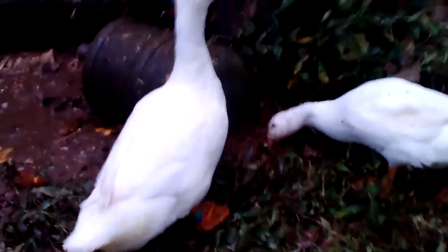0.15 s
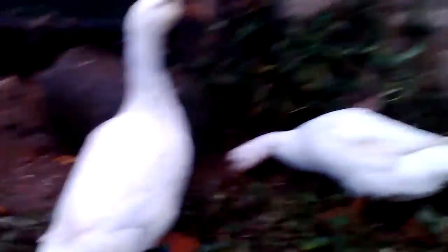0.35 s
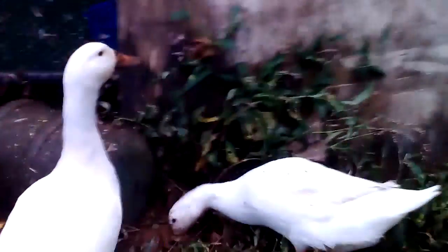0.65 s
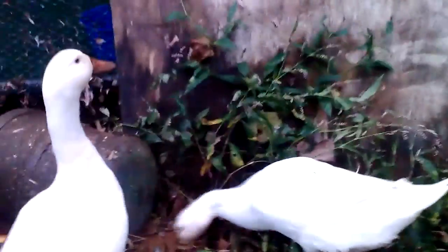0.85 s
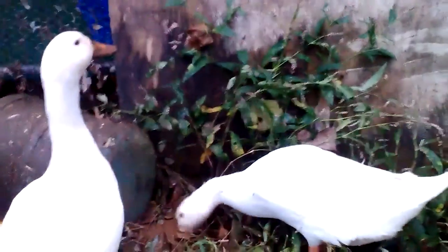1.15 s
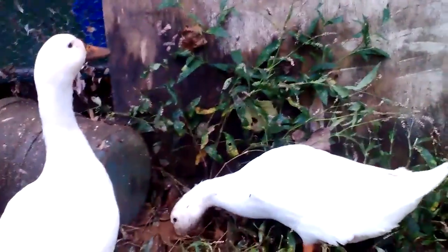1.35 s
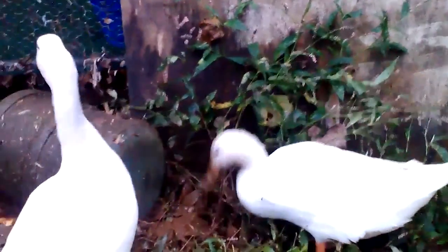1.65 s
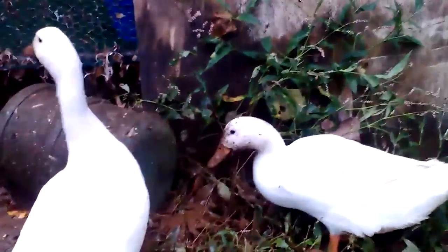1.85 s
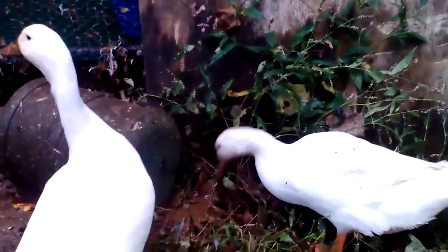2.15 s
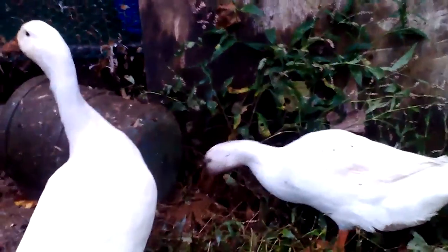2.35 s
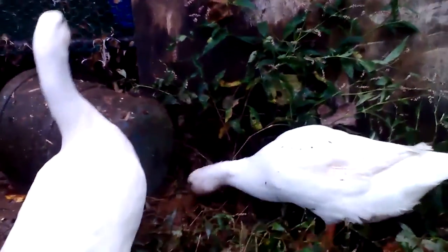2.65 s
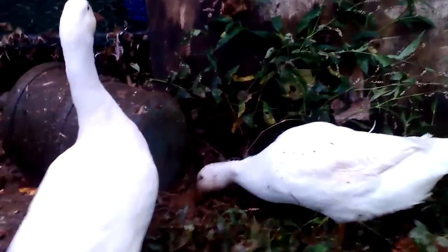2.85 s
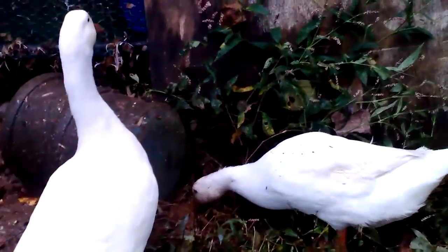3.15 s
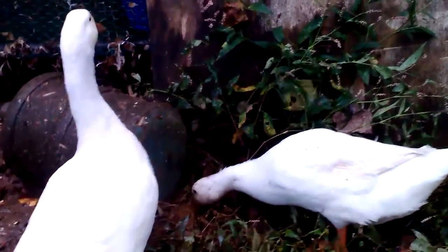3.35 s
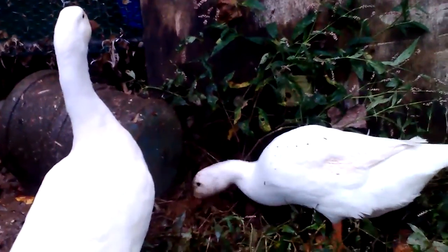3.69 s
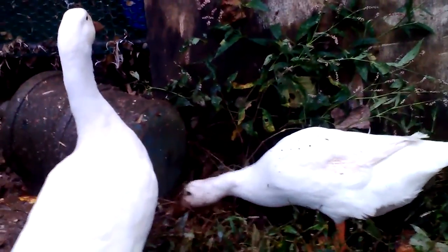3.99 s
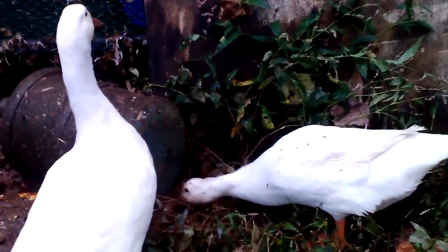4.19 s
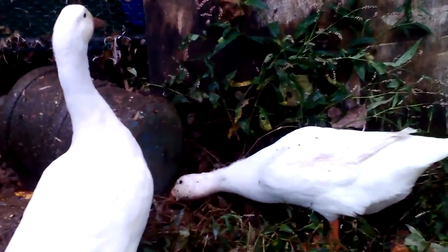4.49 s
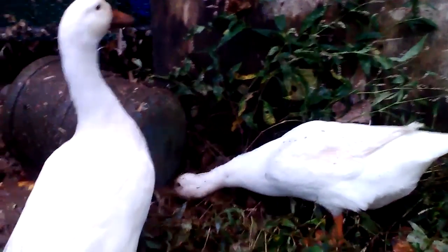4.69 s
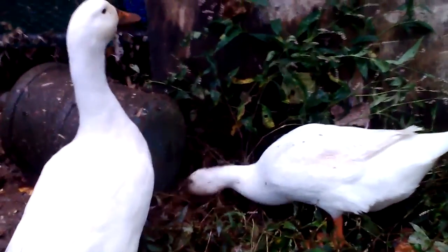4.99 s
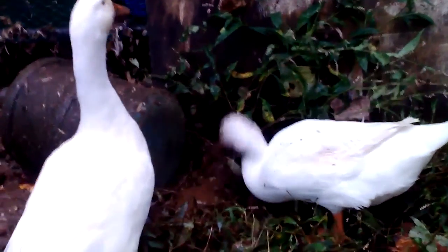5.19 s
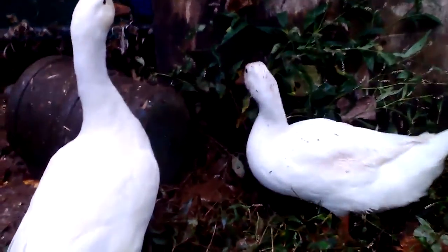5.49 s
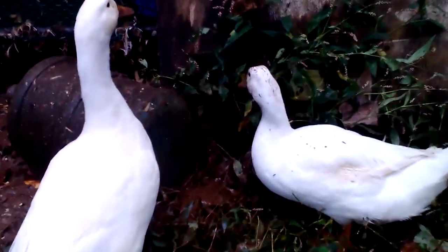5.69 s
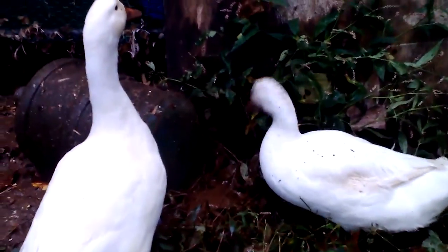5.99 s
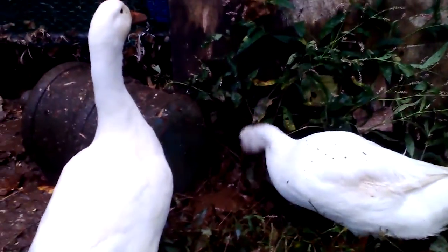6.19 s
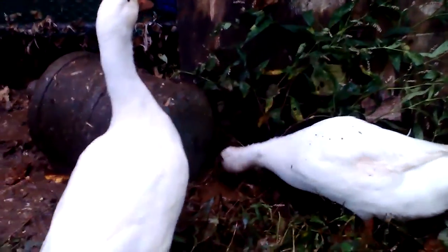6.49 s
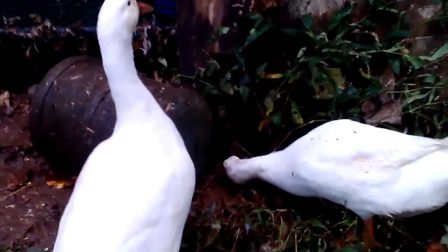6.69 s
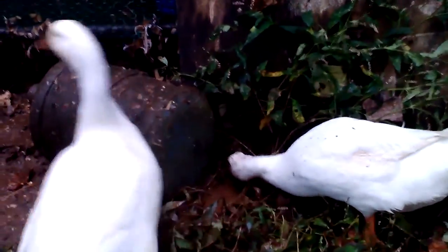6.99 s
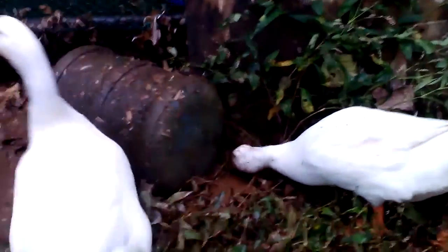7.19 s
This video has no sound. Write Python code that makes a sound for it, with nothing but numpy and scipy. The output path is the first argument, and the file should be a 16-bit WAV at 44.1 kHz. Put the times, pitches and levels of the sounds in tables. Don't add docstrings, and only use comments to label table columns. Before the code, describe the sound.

A drake gives short, raspy, low-pitched quacks, often in pairs, over steady hiss, while bills pop, smack and dabble in wet mud outdoors.

```python
import sys
import numpy as np
from scipy import signal
from scipy.fft import rfft, irfft, next_fast_len
from scipy.io import wavfile
from scipy.ndimage import uniform_filter1d, map_coordinates

SR = 44100
rng = np.random.default_rng(int(sys.argv[2]) if len(sys.argv) > 2 else 0)


def gain_from_db(level_db):
    decades = np.asarray(level_db, float) / 20
    return 10 ** decades


def master_out(mix):
    frames = np.transpose(np.atleast_2d(mix))
    ceiling = np.clip(frames, -1, 1)
    pcm = np.round(ceiling * 32767).astype(np.int16)
    wavfile.write(sys.argv[1], SR, pcm)


N = 323680
t = np.arange(N) / SR


def unit(x):
    return x / np.sqrt(np.mean(x ** 2) + 1e-20)


def along(points, hz):
    f, v = np.transpose(points)
    return np.interp(np.log(hz + 1), np.log(f + 1), v)


def wobble(rate_hz):
    return map_coordinates(rng.standard_normal(int(N * rate_hz / SR) + 4), [t * rate_hz])


def filtered(x, response):
    m = next_fast_len(len(x) + 8192)
    return irfft(rfft(x, m) * response(np.fft.rfftfreq(m, 1 / SR)), m)[:len(x)]


def peak(hz, width_hz, f):
    return 1j * f * width_hz / (hz * hz - f * f + 1j * f * width_hz)


def moving(x, hz, width_hz):
    turn = np.exp(2j * np.pi * np.cumsum(hz) / SR)
    pole = np.exp(-np.pi * width_hz / SR)
    return 2 * np.real(turn * signal.lfilter([(1 - pole) ** 2], [1, -2 * pole, pole ** 2], x / turn))


# freq_hz, density_db
HISS_SPECTRUM = [(15, -51.5), (25, -16.5), (92, 0), (225, -8.5), (442, -10.5), (716, -4), (911, -6.5),
                 (1030, -4), (1970, -3), (2640, -10.5), (3200, -0.5), (4380, -3), (5180, 0.5), (6760, 0),
                 (8000, -12.5), (10400, -55), (17600, -120)]


def hiss():
    z = signal.stft(rng.standard_normal(N), nperseg=512)[2]
    patches = uniform_filter1d(rng.standard_normal(z.shape), size=6, axis=0)
    patches = uniform_filter1d(patches, size=10, axis=1)
    air = signal.istft(z * gain_from_db(1.1 * unit(patches)), nperseg=512)[1][:N]
    level_db = -38 + 0.14 * wobble(9.9)
    return gain_from_db(level_db) * unit(filtered(air, lambda f: gain_from_db(along(HISS_SPECTRUM, f))))


# time_s, pitch_hz, level_db
ENGINES = [
    [(0, 127, -66), (.1, 131.5, -59), (.49, 133, -66.5), (.75, 122, -52.5), (.98, 111, -48),
     (1.42, 92.5, -56.5), (2.22, 96, -58.5), (2.8, 101.8, -54), (3.5, 105, -64)],
    [(3.5, 78.9, -68), (3.96, 78.8, -59.5), (5.3, 81.8, -62), (5.42, 82.3, -51), (5.66, 83, -65),
     (5.9, 84.9, -55.5), (6.43, 85.8, -61), (7.34, 84.1, -64.5)],
]


def drone():
    out = np.zeros(N)
    for rows in ENGINES:
        s, hz, db = np.transpose(rows)
        firing_hz = np.interp(t, s, hz) * (1 + .012 * wobble(21))
        turn = 2 * np.pi * np.cumsum(firing_hz) / SR
        level = uniform_filter1d(gain_from_db(np.interp(t, s, db + 5.5, -120, -120)), size=4000)
        tone = np.sin(turn) + gain_from_db(-28) * np.sin(2 * turn)
        out += level * gain_from_db(1.5 * wobble(8.8)) * tone
    return out


# start_s, length_s, first_hz, last_hz, level_db
PEEPS_FAR = [
    (5.1, .13, 1130, 860, -42.5),
    (7.8, 0.034, 980, 1200, -42),
    (6.232, 0.051, 950, 930, -37),
    (6.605, .05, 790, 630, -43),
    (6.03, .11, 690, 580, -49.5),
    (5.525, 0.043, 900, 900, -50),
]


def peeps():
    out = np.zeros(N)
    top_share, edge_db = .6, -8
    for s, length, first_hz, last_hz, db in PEEPS_FAR:
        knots_s = s + length * np.array([0, top_share, 1])
        level_db = np.interp(t, knots_s, [db + edge_db, db, db + edge_db / 2], -150, -150)
        hz = np.interp(t, [s, s + length], [first_hz, last_hz]) * (1 + .025 * wobble(80))
        level = uniform_filter1d(gain_from_db(level_db + 6.0 * wobble(60)), size=500)
        out += level * np.sin(2 * np.pi * np.cumsum(hz) / SR)
    return out


# time_s, level_db
SIFT_LEVEL = [(0, -52), (.6, -42.5), (1.4, -38), (2.4, -64), (3, -49.5), (4, -41), (4.5, -36), (5, -39.5),
              (5.6, -43.5), (6.4, -46), (6.7, -32), (7.34, -38)]


def sifting(count=2000):
    when, tone, size = rng.random((count, 3)).T
    hz, u = 900 * gain_from_db(17 * tone)[:, None], np.arange(300) / SR
    db = np.interp(when * N / SR, *np.transpose(SIFT_LEVEL)) - 2.5 - 4.55 * np.log(size + 0.014)
    grains = gain_from_db(db[:, None] - 60 * u * hz / 9) * np.sin(2 * np.pi * hz * u)
    at = (when * N).astype(int)[:, None] + np.arange(len(u))
    return np.bincount(at.ravel(), grains.ravel(), N + len(u))[:N]


def pops(rows, gain_db):
    out, u = np.zeros(N + SR), np.arange(1200) / SR
    for s, db, hz, cycles in rows:
        v = u * hz / np.clip(cycles, .6, 6)
        swell = 2.57 * v * np.exp(-2 * v * v)
        ring = np.sin(2 * np.pi * hz * u * (0.97 + 0.052 * v))
        out[round((s + .0015) * SR):][:len(u)] += gain_from_db(db + gain_db) * swell * ring
    return out[:N]


# start_s, peak_db, pitch_hz
LONE_POPS = [(.0485, -30, 1540), (.4856, -32, 1264), (.5147, -34, 1490), (.5405, -27.5, 1280),
             (.5542, -31, 1240), (.591, -33, 1350), (1.1016, -30, 1340), (1.3901, -29, 1180),
             (2.57, -35, 1336), (2.641, -32.5, 1560), (2.8699, -32, 1780), (2.8916, -29, 1940),
             (3.047, -30.5, 1960), (3.1224, -28, 1330), (3.2074, -28.5, 2020), (3.3009, -33, 1400),
             (3.3796, -30, 1390), (3.894, -34, 1950), (4.0257, -29, 1810), (5.3824, -30.5, 1030),
             (6.7388, -20, 1260), (6.787, -33, 1110), (6.8139, -31, 966), (6.8484, -17.5, 1400),
             (6.8949, -7, 1530), (6.9067, -20, 1320), (7.1565, -24, 1300), (7.3, -15, 1870)]
# start_s, peak_db, pitch_hz
DABBLE_POPS = [(4.3174, -34, 1470), (4.33, -29, 1070), (4.359, -33, 1890), (4.3676, -23.5, 1570),
               (4.3939, -21.5, 1630), (4.4248, -27.5, 1660), (4.4548, -30, 1110), (4.49, -28, 1860),
               (4.5053, -42, 1620), (4.522, -25, 940), (4.5306, -26, 1710), (4.5735, -31, 1600),
               (4.585, -35, 902), (4.6097, -25, 1460), (4.62, -37, 1450), (4.6504, -23.5, 1650),
               (4.688, -26, 1790), (4.718, -19, 1630), (4.7836, -22, 1560), (4.8558, -15, 1469),
               (4.9118, -21, 1240)]


def bill_pops():
    rows = []
    for table, ring_s in ((LONE_POPS, 0.0014), (DABBLE_POPS, 0.0012)):
        rows += [(s, db, hz, hz * ring_s) for s, db, hz in table]
    return pops(rows, gain_db=5.5)


# start_s, peak_db, pitch_hz
MUD_GULPS = [(.043, -33.5, 550), (1.101, -38, 393), (1.387, -38, 700), (2.638, -39, 638),
             (2.89, -33.5, 700), (4.43, -32, 694), (4.488, -29, 657), (4.519, -31, 850),
             (4.581, -28.5, 860), (4.649, -28.5, 687), (4.784, -28.5, 740), (6.222, -38, 673),
             (6.316, -34.5, 263), (6.454, -34.5, 738), (6.556, -34.5, 287), (6.599, -27, 756),
             (6.734, -32, 345), (6.812, -39, 824), (6.869, -19.5, 790), (7.326, -35, 570)]


def gulps():
    mud = [(s, db, hz, 0.95) for s, db, hz in MUD_GULPS]
    openings = [(row[0] + 0.00099, -36, 640, 1.53) for row in RASP_CALLS]
    return pops(mud + openings, gain_db=6.5)


def smacks(rows, spiky_db, width_hz):
    out, u = np.zeros(N + SR), np.arange(2200) / SR
    for s, db, hz, length_s in rows:
        span = np.clip(length_s, .0008, .02)
        fine, coarse = rng.standard_normal((2, len(u)))
        clumps = gain_from_db(spiky_db * unit(uniform_filter1d(coarse, size=40)))
        cracks = fine * clumps * np.sqrt(u / span) * np.exp(-(u / span) ** 2)
        film = filtered(cracks, lambda f: peak(hz, width_hz, f) ** 2 + 0.18 * peak(6500, 5000, f) ** 2)
        out[round((s + .0022) * SR):][:len(u)] += gain_from_db(db + 1.5) * film / np.abs(film).max()
    return out[:N]


# start_s, peak_db, pitch_hz
WET_SMACKS = [(.281, -23.5, 4200), (0.486, -19.5, 4220), (0.589, -18.5, 3700), (0.657, -17.5, 5170),
              (.75, -26, 4960), (.78, -18, 5380), (1.113, -21, 5030), (1.479, -31.5, 5770),
              (2.727, -32.5, 4600), (2.968, -29, 5245), (3.046, -25.5, 5200), (3.125, -28, 3800),
              (3.2084, -24.5, 3900), (3.329, -26.5, 4300), (3.379, -19.5, 5126), (3.511, -24.5, 4050),
              (3.795, -26.5, 4130), (3.887, -27, 5070), (4.3553, -21, 5600), (4.421, -11, 5270),
              (4.5262, -23, 4917), (4.65, -23, 5640), (4.778, -31.5, 4060), (.437, -30, 5430),
              (.943, -21, 4970), (3.252, -29, 5300)]
# start_s, peak_db, pitch_hz
LONG_SPLASHES = [
    (1.102, -19.5, 4880),
    (1.1714, -15.5, 4220),
    (1.378, -15, 4680),
    (4.4837, -20.5, 5030),
    (4.496, -16.5, 4620),
    (4.567, -17.5, 5100),
    (4.614, -20.5, 4050),
]


def water_films():
    films = [(s, db, hz, 0.0031 * np.exp(-0.1 * (db + 25))) for s, db, hz in WET_SMACKS]
    splashes = [(s, db, hz, 0.0083) for s, db, hz in LONG_SPLASHES]
    return smacks(films, spiky_db=3.4, width_hz=1260) + smacks(splashes, spiky_db=7.6, width_hz=2300)


def membrane(u, rate_hz, beat_s, jitter, rough, duty):
    drift, breath = rng.standard_normal((2, len(u)))
    phase = np.cumsum(rate_hz) / SR + jitter * unit(uniform_filter1d(drift, size=200))
    phase += 9 - np.interp(beat_s - .0035, u, phase) % 1
    cycle = np.floor(np.maximum.accumulate(phase))
    number = cycle.astype(int)
    sizes = gain_from_db(1.5 * rng.standard_normal(64))[number]
    pulses = np.diff(cycle, prepend=cycle[0]) * sizes
    air = breath * sizes * np.exp((np.cos(2 * np.pi * (phase - .15)) - 1) / duty)
    return np.sqrt(1 - rough) * unit(pulses) + np.sqrt(rough) * unit(air), number


def voice(calls, beats_s, stretch, throat, jitter, rough, duty, focus_hz, shut, sweep):
    out = np.zeros(N + SR)
    for rows, beat_s, (scale, low_db) in zip(calls, beats_s, stretch):
        s, db, rate_hz, bill_hz = np.transpose(rows)
        u = np.arange(s[0], s[-1] + 0.023, 1 / SR)
        source, number = membrane(u, np.interp(u, s, rate_hz), beat_s, jitter, rough, duty)
        closed = np.exp(-(u - s[0]) / 0.017) + 0.18 * np.exp((u - u[-1]) / 0.033)
        share = np.clip((u - s[0]) / (s[-1] - s[0]), 0, 1)
        arch = (1 - np.sin(np.pi * share)) ** 1.5
        centre_hz = np.interp(u, s, bill_hz) * (1.07 - 3.2 * shut * arch)
        sound = 0
        for hz, width_hz, mode_db in throat:
            near = np.exp(-.5 * ((hz - centre_hz) / focus_hz) ** 2) if 1400 < hz < 3000 else 1
            flutter_db = 2 * (hz > 1000) * rng.standard_normal(64)[number]
            flutter_db = uniform_filter1d(flutter_db, size=150)
            late = np.roll(source, round(sweep * SR * (min(hz, 2500) - 1600) / 1000))
            mode = unit(moving(late, hz * (1 - shut * closed) * scale, width_hz))
            level_db = mode_db + low_db * (1100 < hz < 1400) + flutter_db
            sound = sound + gain_from_db(level_db) * near * mode
        even = np.sqrt(np.abs(uniform_filter1d(sound ** 2, size=1100)) + 1e-12)
        fade = np.clip(np.minimum(u - s[0], s[-1] + 0.0064 - u) / 0.0021, 0, 1)
        out[round(s[0] * SR):][:len(u)] += sound / even * gain_from_db(np.interp(u, s, db)) * fade
    return out[:N]


# start_s, length_s, level_db, top_pitch_hz, bill_hz
GRUNT_CALLS = [
    (6.716, 0.061, -24.5, 214, 1410),
    (6.836, 0.12, -22.5, 214, 1430),
    (6.987, 0.099, -14.5, 222.9, 1610),
    (7.154, .105, -15.5, 211.7, 1400),
]
# freq_hz, width_hz, level_db
DUCK_THROAT = [(214, 51, -16.5), (442, 100, -13.5), (644, 132, -8.5), (850, 290, -10.5), (1330, 210, 2.5),
               (1650, 340, -2.5), (2020, 170, -3), (2300, 180, -5), (3430, 320, -21.5), (4400, 3000, -9.5)]


def duck_grunts():
    share = np.array([0, .16, .34, .64, 1])
    shape_db = np.array([-14, -6, 0, -7.5, -25])
    calls = []
    for s, length, db, pitch_hz, bill_hz in GRUNT_CALLS:
        rate_hz = pitch_hz * (1 + .004 * shape_db)
        centre_hz = bill_hz * (1 + .06 * (share - .5))
        calls.append(np.transpose([s + length * share, db + shape_db, rate_hz, centre_hz]))
    beats_s = [row[0] + .02 for row in GRUNT_CALLS]
    return voice(calls, beats_s, [(0.99, -1.4)] * len(calls), DUCK_THROAT,
                 jitter=0.04, rough=0.35, duty=.8, focus_hz=900, shut=0.07, sweep=0.0011)


# gulp_s, strongest_beat_s, bill_open_s, level_db, membrane_hz
RASP_CALLS = [(.184, 0.2386, 0.075, -25.5, 72.84), (.68, 0.727, 0.067, -21, 80.2),
              (0.935, .9846, 0.073, -20.5, 76.2), (1.497, 1.5382, 0.07, -25.5, 68.1),
              (1.75, 1.802, 0.071, -20.5, 82.6), (2.02, 2.0732, 0.069, -21, 82.3),
              (2.679, 2.721, 0.067, -25.5, 64.59), (2.945, 3.0015, 0.067, -23, 69.8),
              (3.398, 3.442, 0.063, -28.5, 61.2), (3.915, 3.9662, 0.069, -21.5, 93),
              (4.181, 4.2337, 0.064, -21.5, 71.5), (4.721, 4.7733, 0.065, -23, 71.7),
              (4.965, 5.0242, 0.071, -20.5, 88.5), (5.228, 5.2883, 0.076, -21, 87.5),
              (5.596, 5.648, 0.077, -22, 83), (5.851, 5.8957, 0.074, -20.5, 84.2),
              (6.282, 6.3354, 0.07, -23, 71.4), (6.524, 6.576, 0.083, -21, 81.3),
              (7.233, 7.2895, 0.083, -21, 86.3)]
# freq_hz, width_hz, level_db
DRAKE_THROAT = [(1262, 165, -3.5), (1570, 206, 1), (1850, 238, 2), (2369, 185, -6), (3755, 230, -18.5),
                (5060, 1500, -15.5)]
# time_s, mode_scale, lowest_mode_db
NECK_POSTURE = [(.2, 0.96, -4), (1, 1.015, -7), (1.55, 1.01, 0), (1.9, 1.036, 2), (3.4, 0.995, 6.5),
                (3.95, 1.043, 12), (4.75, 0.96, -1), (5.02, 0.997, -7), (5.65, 1.008, 0.5), (6.6, 1, -0.5),
                (7.3, 1.04, -2.5)]


def drake_rasps():
    delay_s, attack_s, late_s, release_s = .004, 0.01, 0.000021, 0.026
    shape_db = np.array([-11, -6.5, 0, -4.5, -32])
    knot_s, scale, low_db = np.transpose(NECK_POSTURE)
    calls, beats_s, posture = [], [], []
    for s, beat_s, open_s, db, rate_hz in RASP_CALLS:
        shut_s = s + open_s
        times_s = [s + delay_s, s + delay_s + attack_s, beat_s + late_s, shut_s, shut_s + release_s]
        bill_hz = 1710 + 37 * (db + 22.5)
        calls.append(np.transpose([times_s, db + shape_db, [rate_hz] * 5, [bill_hz] * 5]))
        beats_s.append(beat_s)
        posture.append((np.interp(beat_s, knot_s, scale), np.interp(beat_s, knot_s, low_db)))
    rasps = voice(calls, beats_s, posture, DRAKE_THROAT,
                  jitter=.03, rough=.35, duty=0.79, focus_hz=530, shut=0.17, sweep=.004)
    return filtered(rasps, lambda f: 1 / (1 + 1000 / (1j * f + 1e-9)) ** 2 * 1.46)


def yard(x, wet_db):
    u = np.arange(3000) / SR
    tail = gain_from_db(wet_db) * rng.standard_normal(len(u)) * gain_from_db(-60 * u / 0.06) * (u > .002) / 14
    tail[[0, round(.0038 * SR), round(.0075 * SR)]] += 1, gain_from_db(-20.0), gain_from_db(-20)
    return signal.fftconvolve(x, tail)[:N]


def scene():
    mud = sifting() + bill_pops() + gulps() + water_films()
    birds = peeps() + gain_from_db(-3.5) * (duck_grunts() + drake_rasps())
    mono = hiss() + drone() + yard(mud, wet_db=-6) + yard(birds, wet_db=-3.5)
    return np.array([mono, mono])


def top_cut(x):
    return signal.sosfilt(signal.butter(12, 10040, fs=SR, output="sos"), x)


# freq_hz, level_db
MIRROR_LEAK = [(7600, -63), (8200, -1), (9300, -21), (10000, -37.5), (11000, -66.5), (14500, -64),
               (15000, -120)]


def record(dry):
    rate_hz = 16000
    kept = filtered(dry[0], lambda f: 1 / (1 + (f / 7400) ** 24) * (f < rate_hz / 2) * f ** 4 / (f ** 4 + 47 ** 4))
    kept = kept / (1 + np.abs(kept / 0.47) ** 4) ** .25
    folded = 2 * kept * np.cos(2 * np.pi * rate_hz * t)
    mirror = filtered(folded, lambda f: gain_from_db(along(MIRROR_LEAK, f)) * (f > rate_hz / 2))
    mix = kept + mirror
    return top_cut(np.array([mix, mix]))


dry = scene()
out = record(dry)
master_out(out)
```